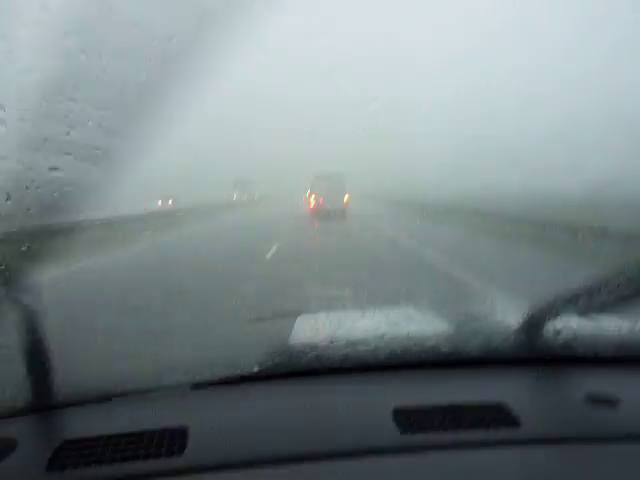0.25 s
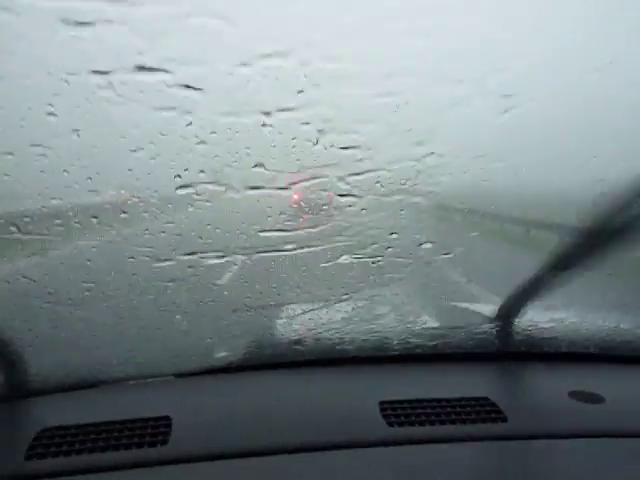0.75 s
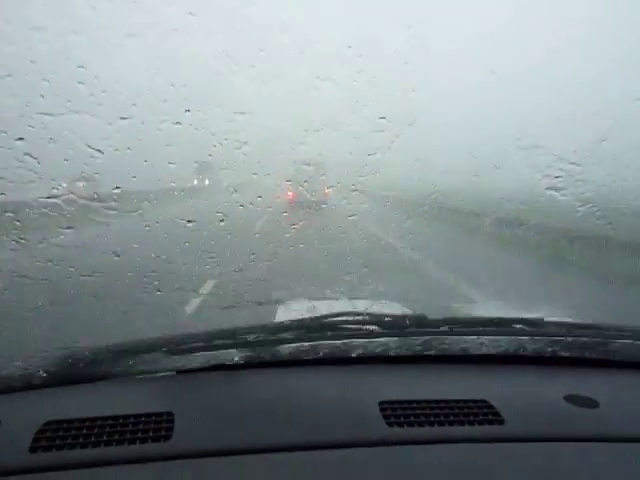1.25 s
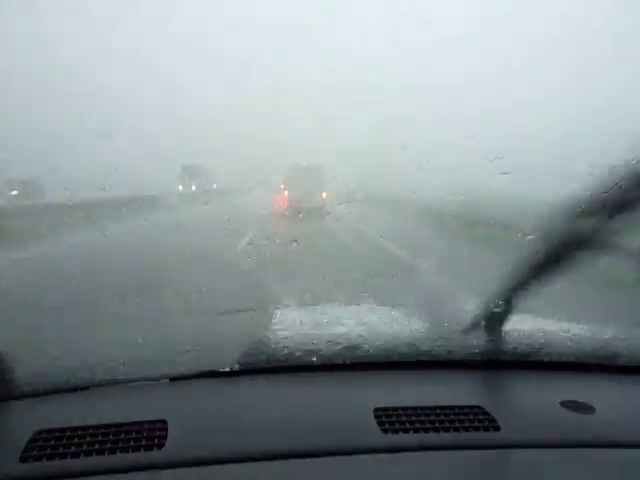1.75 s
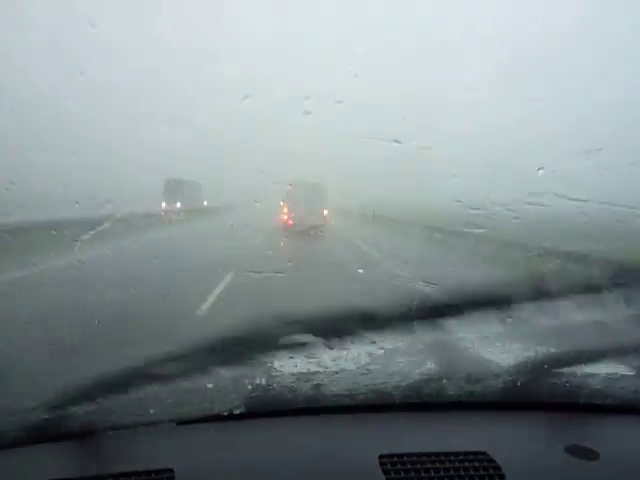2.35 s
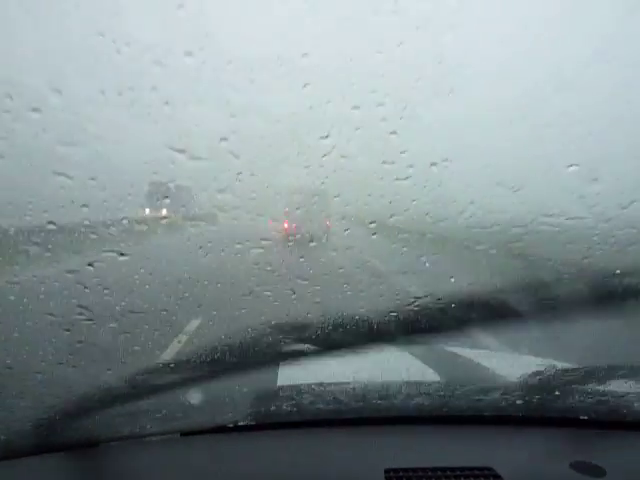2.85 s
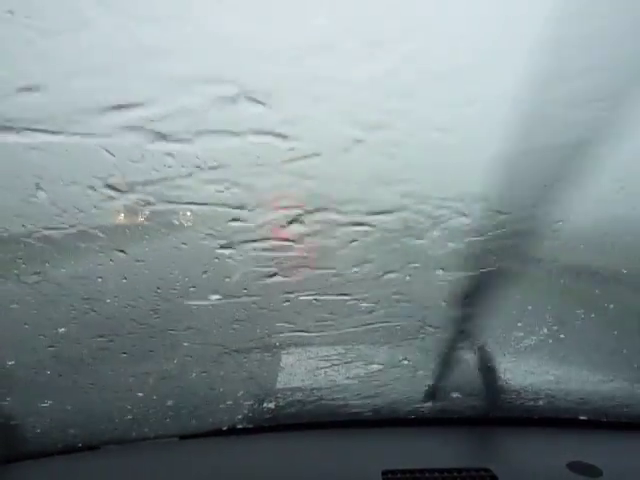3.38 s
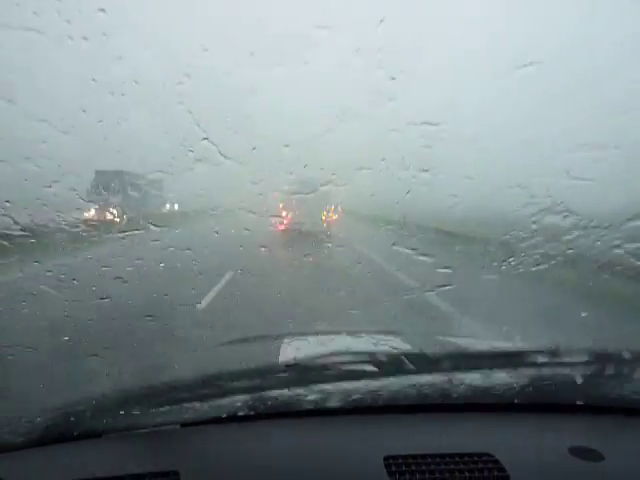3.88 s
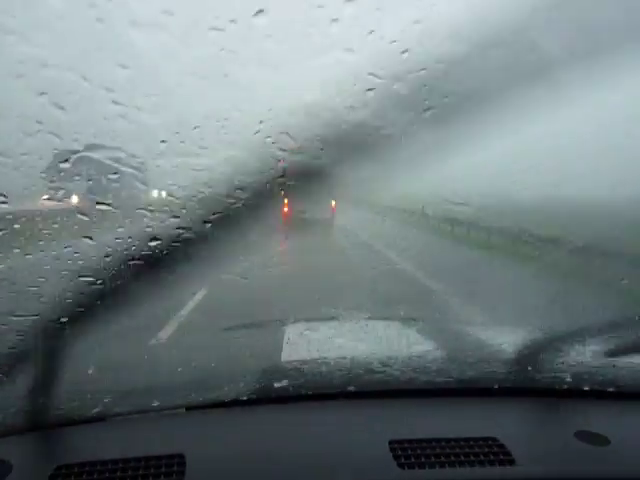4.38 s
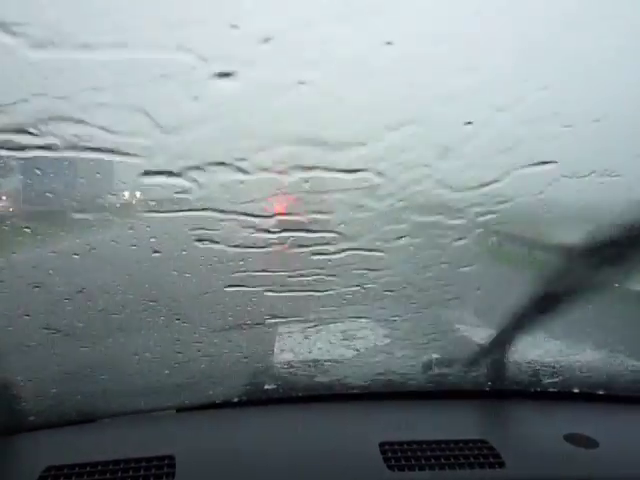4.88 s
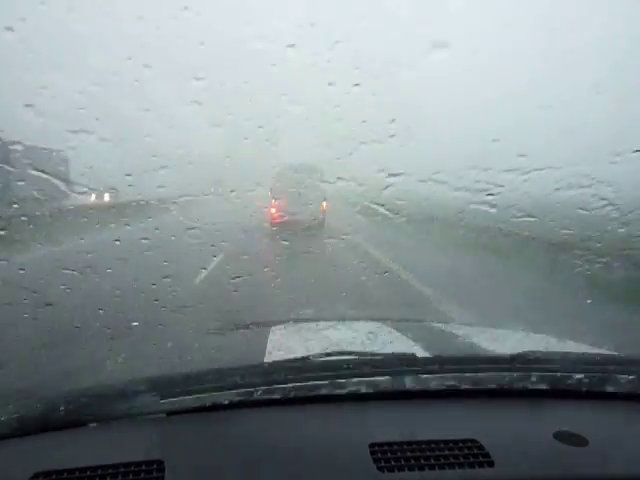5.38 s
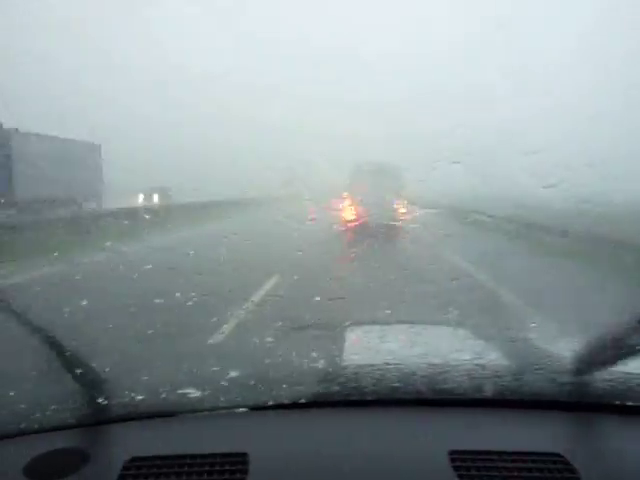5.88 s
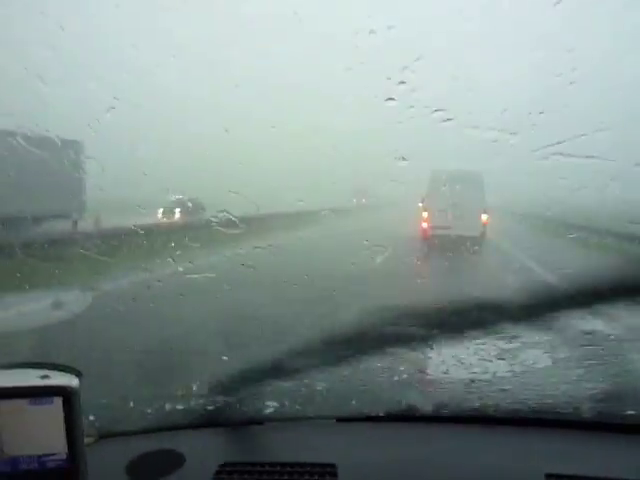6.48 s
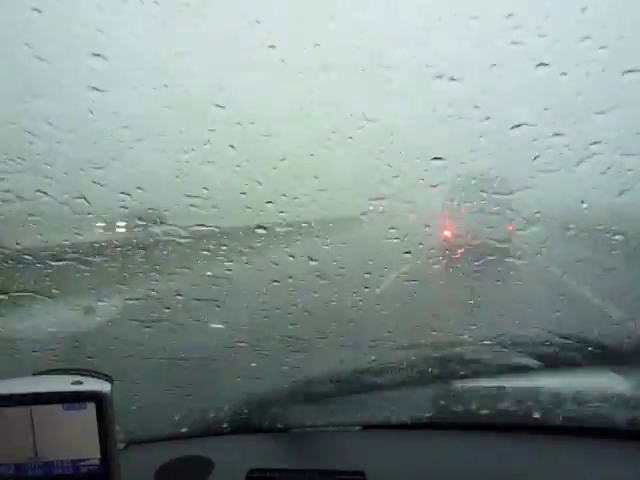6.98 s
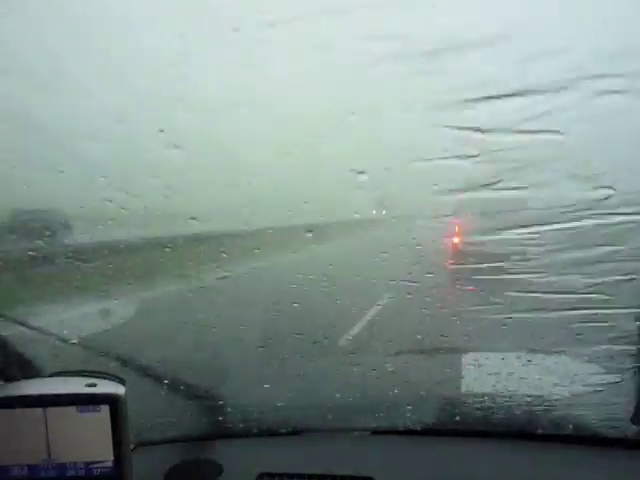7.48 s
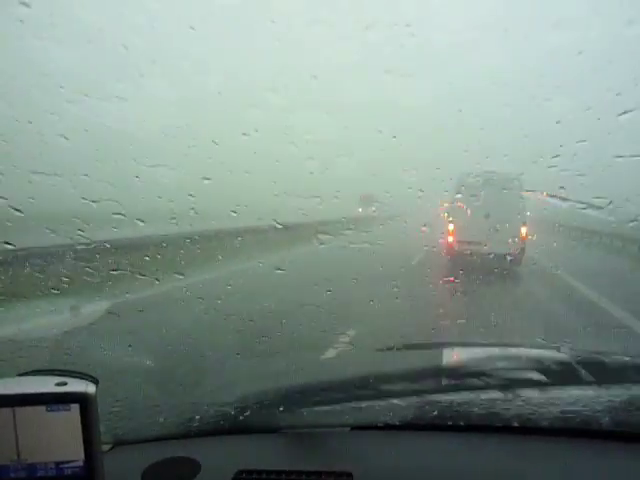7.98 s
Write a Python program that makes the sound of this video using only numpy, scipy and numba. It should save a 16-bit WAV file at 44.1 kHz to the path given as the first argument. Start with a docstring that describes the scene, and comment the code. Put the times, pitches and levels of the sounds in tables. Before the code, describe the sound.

Hailstones clatter rapidly on a moving car's roof and windscreen, heard from inside over pattering rain and faint road rumble.

```python
"""Hail on a moving car, heard close up from inside the cabin on a small camera's microphone.
Each stone cracks and rings the windscreen ahead, the thin panels around and the roof overhead, each with
its own mix. Small stones and rain patter between, the road rumbles underfoot, and a wiper's rubber
sticks and slips, first in a squeak, later in a groan. At listed moments, just after some stones, the
camera's gain ducks and its baseline sags, then both recover."""
import sys
import numpy as np
from scipy import signal
from scipy.fft import rfft, irfft
from scipy.io import wavfile
from scipy.ndimage import uniform_filter1d
from numba import njit

SR = 44100
rng = np.random.default_rng(int(sys.argv[2]) if len(sys.argv) > 2 else 0)


def generate_wav(signal):
    """Clip the signal to [-1, 1] and save it as 16-bit WAV at the path in sys.argv[1]."""
    frames = np.transpose(np.atleast_2d(signal))
    scaled = np.clip(frames, -1, 1) * 32767
    pcm = np.round(scaled).astype(np.int16)
    wavfile.write(sys.argv[1], SR, pcm)


N = 363384


def undb(db):
    return 10 ** (np.asarray(db) / 20)


def on_log(table, hz):
    """Read a (frequency, value) table on a log-frequency axis."""
    table_hz, values = np.transpose(table)
    return np.interp(np.log(hz), np.log(table_hz), values)


def curve(table):
    """Columns of a (time, ...) table, one value a sample."""
    times, *columns = np.transpose(table)
    return [np.interp(np.arange(N) / SR, times, column) for column in columns]


def fade(x, seconds):
    """Every impulse becomes an exponential tail of its own height."""
    return signal.lfilter([1], [1, -np.exp(-1 / (seconds * SR))], x)


# base level of rain and small stones on the windscreen: (time [s], level [dB])
PATTER_LEVEL = [(0.0, -44), (0.78, -36), (0.96, -39.5), (1.31, -34.5), (1.44, -42), (1.7, -45.5),
                (1.99, -40), (2.41, -50.5), (3.03, -40.5), (3.21, -47), (4.31, -45), (4.61, -48.5),
                (5.69, -46.5), (6.24, -45), (6.38, -48.5), (6.77, -48), (7.48, -45), (7.66, -52.5),
                (7.96, -40), (8.1, -45), (8.24, -38.5)]


def patter(sheet_lift_db=3.5):
    """Base levels of the patter on glass and on the louder sheet metal, in dB."""
    glass_db = curve(PATTER_LEVEL)[0]
    return glass_db, glass_db + sheet_lift_db


# strength of the car body's modes, heard from the cabin: (frequency [Hz], level [dB])
BODY_COLOUR = [(90, -16.5), (155, -2.5), (215, -6), (300, 0.5), (400, -3), (480, -5.5), (580, -4),
               (825, -4.5), (1180, -10.5), (1800, -10), (2150, -10), (2500, -9), (2900, -12), (3400, -13.5),
               (4300, -21), (5600, -26)]


def rain(glass_offset_db=-7.5, sheet_offset_db=-3, sing_hz=2650, sing_db=4, sing_octaves=0.19):
    """Drops too dense to count: noise coloured by the sheet metal and by the glass, which sings broadly."""
    hz = np.maximum(np.arange(N // 2 + 1) * SR / N, 1)
    sing = np.exp(-.5 * (np.log2(hz / sing_hz) / sing_octaves) ** 2)
    colour = undb(on_log(BODY_COLOUR, hz) + sing_db * sing) / (1 + (95 / hz) ** 6)
    wash = rfft(rng.standard_normal(N)) * colour
    in_glass = hz > PLATES[0][0]  # above the windscreen's lowest mode
    glass, sheet = irfft(wash * in_glass, N), irfft(wash * ~in_glass, N)
    glass_db, sheet_db = patter()
    return (undb(glass_db + glass_offset_db) * glass / np.std(glass)
            + undb(sheet_db + sheet_offset_db) * sheet / np.std(sheet))


# the road, heard through the floor: (time [s], level [dB])
ROAD_LEVEL = [(0.0, -53.5), (0.71, -49.5), (2.54, -53.5), (2.75, -53), (3.39, -56.5), (5.9, -60),
              (6.06, -53), (6.7, -63.5), (7.14, -54), (7.57, -67), (8.24, -55)]


def road(band_hz=(55, 125)):
    """Tyre and engine rumble below the microphone."""
    band = signal.butter(3, band_hz, "band", fs=SR, output="sos")
    rumble = signal.sosfilt(band, rng.standard_normal(N))
    return undb(curve(ROAD_LEVEL)[0]) * rumble / np.std(rumble)


def small_stones(per_second=240, offset_db=(-9, -12, -15), scatter_db=3.5):
    """Small stones land at random all over the car; rows as in LARGE_STONES."""
    times = rng.uniform(0, N / SR, int(per_second * N / SR))
    chance = rng.random((len(times), 5))
    glass_db, sheet_db = (db[(times * SR).astype(int)] for db in patter())
    size_db = scatter_db * np.minimum(-np.log(chance[:, :3]), 3)
    level_db = size_db + offset_db + np.transpose([glass_db, sheet_db, sheet_db])
    glass_hz, sheet_hz = 1500 + 1500 * chance[:, 3], 150 + 800 * chance[:, 4]
    return np.column_stack([times, level_db, glass_hz, sheet_hz])


@njit
def ring(at, push, pole, rise):
    """Decaying modes; blow j at sample at[j] pushes mode m; taking off a faster decay makes the rise."""
    out = np.zeros(N)
    for m in range(len(pole)):
        mode, early, j = 0j, 0j, 0
        for i in range(N):
            mode = mode * pole[m] + 1e-18
            early = early * pole[m] * rise + 1e-18
            while j < len(at) and at[j] <= i:
                mode, early, j = mode + push[j, m], early + push[j, m], j + 1
            out[i] += (mode - early).imag
    return out


# how long the body rings around the microphone: (frequency [Hz], time to fall 60 dB [s])
RING_TIME = [(100, 0.41), (300, 0.23), (700, 0.1), (1800, 0.087), (3200, 0.071), (5600, 0.035)]
# windscreen ahead, panels around, roof overhead: (lowest mode [Hz], highest mode [Hz], modes [count],
# rise [ms], phase spread [0-1], crack delay at the lowest mode [ms], lift of the region that rings
# most [dB], its width [octaves])
PLATES = [(1153, 5600, 130, 0.23, 0.72, 2.6, 8.5, 0.12), (447.1, 1130, 40, 1.26, 0.78, 3.997, 10, 0.07),
          (88.1, 480, 34, 1.4, 0.65, 13.06, 9.5, 0.35)]


def plate(part, times, level_db, centre_hz, spot_db, dull=0, dull_db_octave=0, travel_s=.0003):
    """Evenly dense modes; where a stone lands sets the strength of each and the region that rings most."""
    lo_hz, hi_hz, count, rise_ms, spread, crack_ms, lift_db, lift_octaves = part
    hz = lo_hz + (hi_hz - lo_hz) * (np.arange(count) + rng.uniform(.25, .75, count)) / count
    pole = np.exp(2j * np.pi * hz / SR - np.log(1000) / (on_log(RING_TIME, hz) * SR))
    chance = rng.random((len(times), 2, count)) - .5
    region = np.exp(-.5 * (np.log2(hz / centre_hz[:, None]) / lift_octaves) ** 2)
    landing_db = 2 * spot_db * chance[:, 0] + lift_db * (1 - .5 * dull) * region
    tilt_db = dull_db_octave * dull * np.log2(hz / lo_hz)
    weight = undb(on_log(BODY_COLOUR, hz) + landing_db + tilt_db)
    weight /= np.linalg.norm(weight, axis=1, keepdims=True)
    # just after contact the modes fall nearly into step: a crack; bending waves bring the treble first
    scatter_turns = np.clip(spread + (1 - spread) * dull, 0, 1) * chance[:, 1]
    lag_turns = 2 * np.sqrt(lo_hz * hz) * crack_ms / 1000 + .25
    push = undb(level_db)[:, None] * weight * np.exp(2j * np.pi * (scatter_turns - lag_turns))
    order = np.argsort(times)
    arrivals = ((times[order] + travel_s) * SR).astype(np.int64)
    return ring(arrivals, push[order], pole, np.exp(-1000 / (rise_ms * SR)))


# large stones on the car, heard from inside: (time [s], glass tick [dB], panel knock [dB],
# roof boom [dB], glass rings most near [Hz], sheet metal rings most near [Hz])
LARGE_STONES = [(0.1325, -35, -31.5, -40, 1310, 506), (0.157, -37, -29.5, -36, 2010, 810),
                (0.2233, -36.5, -33.5, -39, 2880, 431), (0.2759, -25, -23.5, -30.5, 2830, 840),
                (0.3722, -30, -27.5, -30.5, 2340, 1000), (0.4112, -25, -20.5, -46, 1270, 560),
                (0.449, -23.5, -18.5, -28.5, 1230, 750), (0.522, -22.5, -13.5, -17.5, 1310, 860),
                (0.566, -28, -19.5, -23, 1430, 627), (0.574, -23, -41, -25.5, 2740, 139),
                (0.592, -53, -49, -34, 2340, 110), (0.6152, -31, -42.5, -46, 2760, 156),
                (0.6708, -20, -13.5, -18.5, 1250, 740), (0.692, -37, -25, -17, 1240, 202),
                (0.7304, -29.5, -23.5, -24, 1560, 800), (0.745, -39, -19.5, -38, 2760, 440),
                (0.8301, -35, -43, -35, 2560, 300), (0.939, -14, -16, -20.5, 2770, 463),
                (0.957, -22, -16.5, -24, 1270, 368), (0.998, -32.5, -40, -48, 2720, 240),
                (1.14, -26, -19.5, -30, 2900, 500), (1.147, -31, -36, -23.5, 2380, 122),
                (1.164, -30.5, -25.5, -25, 2590, 322), (1.211, -37, -30.5, -28.5, 2400, 115),
                (1.2497, -24.5, -21.5, -30, 1310, 333), (1.289, -44, -47, -27.5, 2430, 94),
                (1.333, -20, -13.5, -15.5, 1740, 548), (1.355, -32.5, -25, -21, 1930, 320),
                (1.4019, -24, -17.5, -21.5, 1250, 665), (1.4213, -15.5, -16.5, -56, 2720, 715),
                (1.4852, -29.5, -25, -24, 1240, 343), (1.678, -20.5, -25, -22.5, 2960, 310),
                (1.701, -32, -27.5, -42, 2780, 730), (1.7796, -25, -18.5, -23, 1550, 427),
                (1.799, -35.5, -23, -20, 1260, 428), (1.813, -30, -21.5, -19.5, 3300, 495),
                (1.8308, -20, -19, -29, 3020, 810), (1.893, -32, -43, -50, 2500, 800),
                (1.91, -28.5, -44, -45, 1880, 583), (1.945, -38.5, -24, -24.5, 1250, 390),
                (1.989, -25.5, -21.5, -50, 1510, 550), (2.0, -24, -26, -26, 3230, 804),
                (2.035, -30, -32, -41, 1980, 600), (2.076, -34.5, -30, -47, 1800, 610),
                (2.1625, -20, -20, -25, 3180, 770), (2.2707, -22.5, -15.5, -24.5, 1270, 856),
                (2.389, -26, -26.5, -34, 2420, 785), (2.4626, -18, -19.5, -27, 2570, 702),
                (2.6251, -31, -33, -37, 1540, 675), (2.6812, -24.5, -23, -31.5, 2710, 450),
                (2.8195, -41, -27, -36, 1260, 483), (2.841, -54, -29, -42, 1250, 534),
                (2.8533, -30.5, -27.5, -35, 1270, 1030), (2.978, -18.5, -22.5, -44.5, 2900, 934),
                (3.0229, -28, -26.5, -46, 2395, 704), (3.1431, -18.5, -15.5, -24, 3080, 820),
                (3.2556, -35.5, -29, -44, 1250, 326), (3.271, -20, -18.5, -21, 2000, 410),
                (3.3658, -29.5, -26, -28.5, 1680, 267), (3.385, -41.5, -31.5, -19.5, 1260, 168),
                (3.4955, -25.5, -13.5, -22, 1660, 797), (3.512, -39, -19.5, -40, 1250, 825),
                (3.538, -26.5, -19.5, -38, 1990, 623), (3.556, -34, -24.5, -24, 2480, 412),
                (3.59, -26.5, -27, -29, 2250, 595), (3.667, -28, -24.5, -35, 1500, 770),
                (3.68, -20, -21, -25, 2300, 756), (3.7212, -24.5, -21, -23.5, 1170, 522),
                (3.7746, -31.5, -28, -29, 2510, 397), (3.7882, -21.5, -24, -30, 2570, 456),
                (3.8313, -21.5, -25, -26, 2330, 296), (3.8931, -24, -25.5, -33, 2280, 1030),
                (3.922, -32, -19, -17.5, 1430, 430), (3.934, -33, -27.5, -21.5, 1430, 433),
                (4.0223, -35, -46, -46, 2560, 471), (4.057, -37, -28, -34, 1480, 480),
                (4.081, -28, -22.5, -26.5, 2320, 322), (4.105, -26, -21.5, -21, 1870, 174),
                (4.1321, -26.5, -23.5, -20, 2020, 430), (4.142, -35, -24.5, -22.5, 1250, 430),
                (4.1862, -25, -12, -16, 2000, 463), (4.204, -34, -16.5, -36, 1260, 750),
                (4.2349, -31, -30, -41, 2530, 810), (4.329, -22.5, -23, -29.5, 2230, 705),
                (4.375, -32, -31, -37, 3370, 825), (4.422, -19, -22, -27, 2400, 830),
                (4.463, -36.5, -27, -27.5, 1270, 580), (4.482, -28.5, -25, -23, 1940, 407),
                (4.498, -39, -26.5, -36, 1240, 383), (4.552, -37, -38.5, -51, 2480, 500),
                (4.6157, -22.5, -19, -30, 2230, 902), (4.764, -18, -17.5, -25, 2520, 945),
                (4.913, -20, -27.5, -29, 2600, 307), (4.9653, -23, -20, -28, 2680, 720),
                (5.035, -33.5, -26.5, -30.5, 2080, 600), (5.149, -17.5, -26.5, -26.5, 2750, 310),
                (5.1938, -36, -32, -40, 2580, 850), (5.2214, -19.5, -15.5, -22.5, 2660, 840),
                (5.2916, -25.5, -14, -32, 1610, 810), (5.315, -27.5, -25, -28, 1250, 553),
                (5.3434, -30.5, -27.5, -28, 3000, 285), (5.4256, -21.5, -26, -29.5, 3030, 303),
                (5.444, -22.5, -19.5, -27.5, 2780, 736), (5.5207, -32, -33.5, -40, 2340, 690),
                (5.5471, -20, -24, -32, 2550, 800), (5.562, -31, -44, -40, 3000, 800),
                (5.6035, -21, -15.5, -19, 2880, 550), (5.623, -30, -37, -37, 2700, 720),
                (5.6444, -28.5, -19, -21.5, 1270, 322), (5.6861, -20, -18, -28.5, 2600, 580),
                (5.746, -30.5, -32.5, -31.5, 2830, 300), (5.783, -33, -30, -37, 2500, 760),
                (5.83, -23.5, -22.5, -24.5, 1450, 302), (5.899, -22, -21, -25, 2390, 368),
                (5.917, -29.5, -14.5, -22.5, 1250, 560), (5.944, -31, -22.5, -25, 1260, 467),
                (6.0068, -30.5, -29, -38, 2200, 587), (6.1138, -31, -30.5, -36, 1770, 550),
                (6.1267, -31.5, -27, -28.5, 2620, 460), (6.2045, -37.5, -32, -46, 2280, 813),
                (6.228, -34, -30.5, -35.5, 3200, 872), (6.252, -27.5, -24.5, -35, 1510, 470),
                (6.269, -20, -21.5, -25.5, 2490, 530), (6.318, -23, -21.5, -24, 1470, 390),
                (6.3345, -24.5, -32, -43, 2730, 695), (6.3522, -25, -26, -45, 2630, 600),
                (6.4204, -30, -27, -39, 1440, 844), (6.447, -29.5, -28, -28, 1690, 300),
                (6.4819, -27.5, -26.5, -24.5, 1450, 423), (6.5193, -23.5, -25.5, -33, 2950, 790),
                (6.568, -27.5, -22, -31, 2600, 560), (6.575, -26, -21.5, -23.5, 1450, 552),
                (6.6266, -41.5, -39.5, -29, 2310, 800), (6.6387, -19.5, -18.5, -32, 2270, 860),
                (6.661, -34, -26, -31, 2470, 228), (6.762, -21, -26.5, -34.5, 2360, 1090),
                (6.8794, -24, -25, -29.5, 2270, 390), (6.896, -27, -10.5, -27.5, 1270, 815),
                (6.944, -23.5, -32, -54, 2480, 750), (6.9904, -29, -21.5, -23.5, 1250, 370),
                (7.001, -33, -22.5, -21, 2500, 590), (7.016, -48, -34, -26, 1250, 324),
                (7.06, -31.5, -28, -24, 1220, 610), (7.0874, -19.5, -20.5, -28.5, 2580, 950),
                (7.1434, -35, -33.5, -36, 2230, 470), (7.184, -36, -27, -26, 2620, 690),
                (7.19, -31, -20, -28, 1270, 677), (7.2017, -23, -20, -45, 2410, 830),
                (7.256, -34.5, -28.5, -41, 2770, 600), (7.2644, -26, -20.5, -21.5, 1570, 393),
                (7.316, -25, -29, -35, 2660, 706), (7.3405, -25.5, -24.5, -26.5, 2740, 935),
                (7.3898, -29.5, -26.5, -45, 2560, 307), (7.41, -27.5, -18.5, -15.5, 1510, 358),
                (7.4366, -25, -23.5, -40, 2010, 543), (7.4578, -24.5, -26.5, -32.5, 2560, 755),
                (7.5108, -16, -24, -38, 2780, 730), (7.5343, -46, -21, -25, 2260, 340),
                (7.547, -30.5, -39, -28, 3020, 400), (7.58, -23.5, -24.5, -27, 1410, 790),
                (7.6229, -30.5, -23.5, -27, 1280, 416), (7.6937, -31.5, -30, -33, 1480, 804),
                (7.715, -31.5, -27.5, -33, 1260, 613), (7.801, -35, -36, -33.5, 1270, 387),
                (7.833, -43, -31, -32, 2000, 530), (7.877, -37, -34, -42, 3220, 940),
                (7.89, -21.5, -25, -46, 1530, 800), (7.9378, -24, -28.5, -34, 2760, 720),
                (7.965, -28, -25, -30.5, 2260, 700), (7.9938, -24.5, -21, -23, 2400, 373),
                (8.016, -21, -16, -48, 2960, 756), (8.055, -21, -17, -21.5, 1480, 565),
                (8.066, -35.5, -21.5, -23.5, 1500, 490), (8.104, -21.5, -33, -29, 2840, 450),
                (8.177, -23, -17.5, -31.5, 1280, 573), (8.198, -33, -24.5, -22, 1800, 600),
                (8.2172, -30.5, -26, -26, 1258, 426), (8.2333, -25, -20, -26, 1620, 596)]


def hail(through_frame_s=.0006):
    """Large stones, their chips and small stones all ring the same windscreen, panels and roof."""
    large = np.array(LARGE_STONES, float)
    blows = np.concatenate([large, chips(large), small_stones()])
    times, glass_db, panel_db, roof_db, glass_hz, sheet_hz = blows[np.argsort(blows[:, 0])].T
    glass, panels, roof = PLATES
    # a stone on metal reaches the glass only through the frame: later, darker, and without a crack
    on_metal = np.clip((panel_db - glass_db) / 13, 0, 1)
    glass_times = times + on_metal * through_frame_s
    ticks = plate(glass, glass_times, glass_db, glass_hz, spot_db=9, dull=on_metal[:, None],
                  dull_db_octave=-6)
    knocks = plate(panels, times, panel_db, sheet_hz, spot_db=7)
    booms = plate(roof, times, roof_db, sheet_hz, spot_db=11)
    return ticks + knocks + booms


def chips(stones, offset_db=(-15, -15, -19), delay_s=.0044, spread_s=.02, rattle_db=8):
    """Each stone breaks into three chips that land just after it, more softly."""
    pieces = np.repeat(stones, 3, axis=0)
    chance = rng.random((len(pieces), 3))
    pieces[:, 0] += delay_s + spread_s * chance[:, 0]
    pieces[:, 1:4] += offset_db - 9 * chance[:, 1:2]
    # stones on metal make their chips rattle the glass more loudly
    pieces[:, 1] += rattle_db * np.clip((pieces[:, 2] - pieces[:, 1]) / 12, 0, 1)
    pieces[:, 4] *= 2 ** (chance[:, 2] - .5)  # glass rings up to half an octave away
    return pieces


# moments when the camera ducks and sags, just after some stones: (time [s], sag depth [dB])
CAMERA_SAGS = [(0.454, -25.5), (0.941, -27), (1.3328, -38), (1.422, -21), (1.682, -40), (1.799, -36),
               (1.834, -27), (2.17, -25.5), (2.276, -35), (2.47, -30), (2.979, -41.5), (3.148, -24),
               (3.2722, -37.5), (3.728, -24), (3.9, -27.5), (4.186, -28.5), (4.424, -30), (4.623, -29),
               (4.771, -36.5), (5.154, -46.5), (5.228, -24), (5.447, -29.5), (5.548, -40), (5.602, -33.5),
               (5.6895, -35.5), (5.916, -30.5), (6.274, -26), (6.6446, -24.5), (6.899, -26),
               (7.0953, -29.5), (7.205, -36), (7.4095, -30.5), (7.513, -30.5), (8.02, -37), (8.18, -41), ]


def camera_duck(onset_s=.0029):
    """The camera's gain ducks and its baseline sags at the listed moments; each recovers at two rates."""
    drops, span = np.zeros(N), int(onset_s * SR)
    for time, depth_db in CAMERA_SAGS:
        start = int(time * SR) - span // 2
        drops[start:start + span] += undb(depth_db) / span
    gain_db = -71.5 * fade(drops, seconds=.13) - 9 * fade(drops, seconds=.024)
    baseline = -undb(-46) - fade(drops, seconds=.034) - undb(-26) * fade(drops, seconds=.8)
    return undb(gain_db), baseline


# wiper blade on the far side of the windscreen: (time [s], slip rate [Hz], level [dB])
WIPER_SQUEAK = [(0.87, 407, -33.5), (0.96, 378.6, -26), (1.0, 393, -48)]
WIPER_GROAN = [(2.57, 119.4, -63), (2.602, 109.0, -46), (2.62, 101.3, -50), (2.654, 80, -53),
               (2.668, 74.1, -51), (2.846, 62.5, -41.5), (2.9, 62.7, -42), (2.97, 53.6, -54)]


def wiper(stroke, overtone_db, flutter_db, waver):
    """Rubber sticks and slips unevenly on the glass: a fluttering tone with weaker overtones."""
    hz, level_db = curve(stroke)
    t = np.arange(N) / SR
    grip = uniform_filter1d(uniform_filter1d(rng.standard_normal(N), 900), 900)
    grip /= np.std(grip)
    phase = 2 * np.pi * np.cumsum(hz * (1 + waver * grip)) / SR
    tone = sum(undb(db) * np.sin(k * phase) for k, db in enumerate((0, *overtone_db), 1))
    sliding = uniform_filter1d(1. * ((t > stroke[0][0]) & (t < stroke[-1][0])), 700)
    return sliding * undb(level_db + flutter_db * grip) * np.sqrt(2) * tone


def scene():
    """Hail, rain, wiper and road as they reach one spot in the cabin."""
    # the body radiates little below its lowest mode
    low_cut = signal.butter(3, 80, "high", fs=SR, output="sos")
    weather = signal.sosfilt(low_cut, hail() + rain())
    squeak = wiper(WIPER_SQUEAK, overtone_db=(-14,), flutter_db=3, waver=.0252)
    groan = wiper(WIPER_GROAN, overtone_db=(-8, -15, -12, -14), flutter_db=.8, waver=.008)
    return (weather + squeak + groan + road())[None]


def record(dry, mic_hz=3803, hiss_db=-63, top_hz=9200):
    """The camera: ducks and sags, rounded peaks, a narrow channel, steady hiss, a cut at the top."""
    gain, baseline = camera_duck()
    rounded = np.tanh(gain * dry)
    mic = signal.sosfilt(signal.butter(8, mic_hz, fs=SR, output="sos"), rounded) + baseline
    hiss = undb(hiss_db) * rng.standard_normal(N)
    return signal.sosfilt(signal.cheby2(7, 38, top_hz, fs=SR, output="sos"), mic + hiss)


dry = scene()
out = record(dry)
generate_wav(out)
```